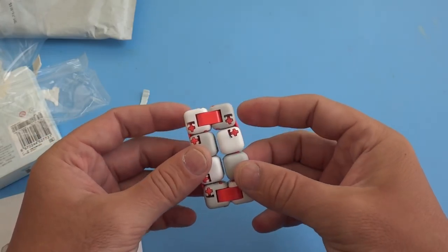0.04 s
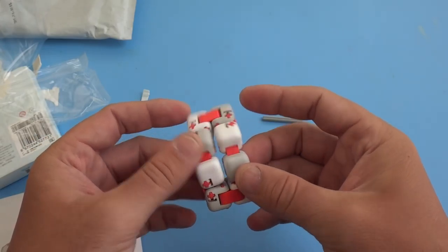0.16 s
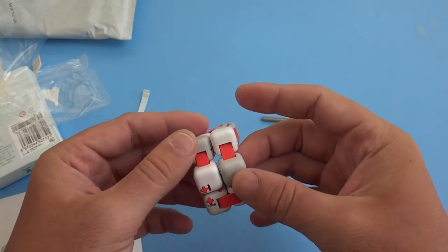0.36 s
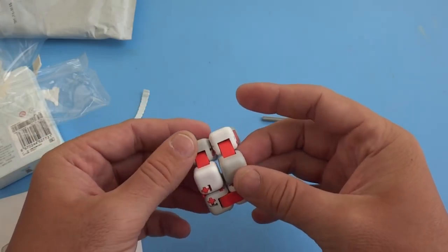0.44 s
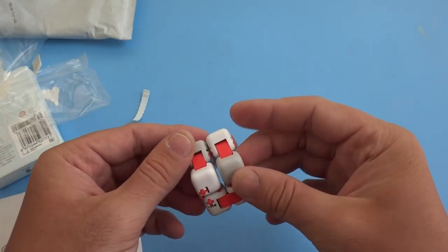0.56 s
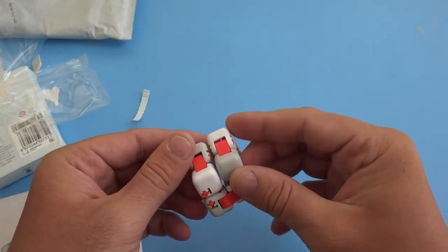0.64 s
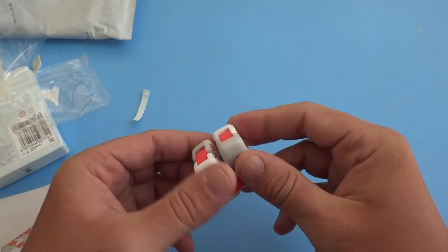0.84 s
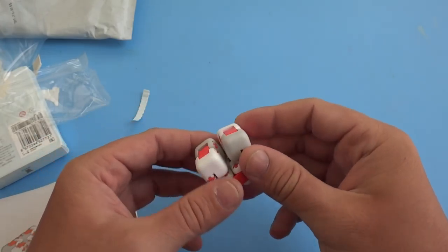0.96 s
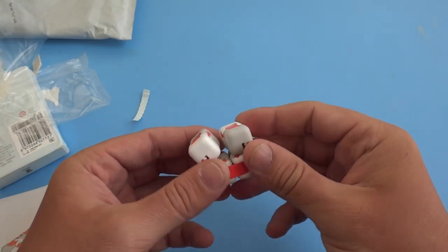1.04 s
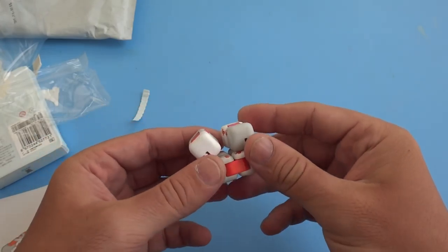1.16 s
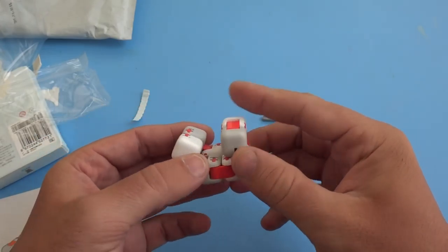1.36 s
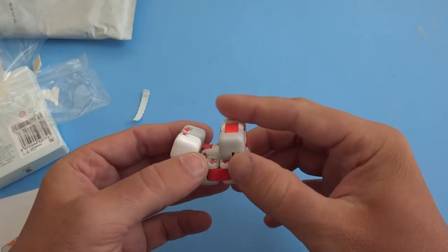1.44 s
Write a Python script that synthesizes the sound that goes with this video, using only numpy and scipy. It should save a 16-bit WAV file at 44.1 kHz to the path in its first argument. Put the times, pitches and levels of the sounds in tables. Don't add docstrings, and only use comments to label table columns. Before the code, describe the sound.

Hands fold small hollow plastic cubes near a camera microphone in a quiet room; loudest clicks and rattle come first, more snaps follow, fading to tiny taps over low rumble, hiss and fine mechanical ticking.

```python
import sys
import numpy as np
from scipy import signal
from scipy.fft import rfft, irfft
from scipy.io import wavfile

SR = 44100
rng = np.random.default_rng(int(sys.argv[2]) if len(sys.argv) > 2 else 0)


def ratio_of_db(decibels):
    return 10 ** (np.asarray(decibels, float) / 20)


def master(y):
    cut = np.clip(np.atleast_2d(y).T, -1, 1)
    pcm = np.round(cut * 32767)
    wavfile.write(sys.argv[1], SR, pcm.astype(np.int16))


N = 66150

# (time [s], peak level [dB],
# ring [Hz], bright crack level [dB], dull knock level [dB])
FOLD_TOUCHES = [(.1945, -37, 8400, -13, -15), (.2038, -35, 6460, -15, -20), (.2150, -27, 6350, -19, -24),
                (.2170, -20.5, 6700, -11, -25), (.2187, -12.5, 6420, -25, -42),
                (.2206, -23.5, 6600, -27, -38), (.2349, -24, 5800, -33, -42), (.2355, -12.5, 7300, -24, -41),
                (.2368, -10.5, 6930, -26, -40), (.2497, -33.5, 6900, -9, -26), (.2643, -32, 6200, -20, -9),
                (.4134, -25, 7400, -6, -25), (.4148, -24.5, 6600, -23, -40), (.4157, -35, 6600, -19, -23),
                (0.586, -36, 6700, -15, -23), (.5978, -33, 6700, -18, -25), (0.633, -33, 6500, -12, -13),
               (0.638, -28, 6600, -10, -13), (0.6406, -24.5, 7700, -10, -22.5),
               (.6420, -29.5, 5800, -13, -18), (0.6427, -31, 6600, -1, -15.5),
               (0.669, -21.5, 6700, -25, -29), (0.6691, -28, 6700, -26, -34), (0.688, -49, 6700, -18, -22),
               (.7640, -36, 6530, -22, -28), (.7780, -17, 7440, -14, -18.5),
               (0.7792, -11.5, 6290, -10, -19.5), (0.7805, -19, 8100, -18, -30),
               (0.7814, -28, 6800, -20, -38), (.8550, -36, 6650, -10, -15),
                (0.9462, -34.5, 6000, -17, -15), (0.948, -29.5, 6130, -6.5, -14),
             (.9510, -30, 6460, -9.5, -11), (0.966, -40, 7340, -18, -23), (1.0197, -22.5, 7280, -10.5, -27),
             (1.0199, -23, 6500, -25, -33), (1.0209, -20.5, 8150, -16, -27), (1.0203, -27, 7900, -19, -20),
             (1.0710, -32, 6350, -10.5, -12), (1.0940, -38.5, 5700, -16, -8), (1.1235, -30, 7020, -20, -19),
             (1.136, -35, 5900, -18, -25), (1.146, -43, 6000, -18, -3), (1.1768, -38.5, 6560, -22, -4),
             (1.2463, -32, 6440, -21, -16), (1.4870, -38, 6700, -20, -26)]
# (frequency [Hz], level [dB])
SIDE_RINGS = [(5450, -13), (8300, -10)]
# (frequency [Hz], width [Hz], level [dB])
CRACK_BODY = [(10020, 1320, 4), (12600, 1460, -0.5), (14570, 990, 0), (15100, 640, -13)]
# (frequency [Hz], width [Hz], level [dB])
KNOCK_BODY = [(2030, 930, -8.5), (2790, 920, -10.5), (3430, 520, 0.5), (5440, 500, -2)]
# (time [s], peak level
# [dB], ring [Hz])
TAIL_TICKS = [(0.2228, -20, 6500), (0.2232, -42, 6760), (0.2267, -26, 6200), (0.229, -32, 6330),
              (0.2323, -25, 6000), (0.2336, -23, 7020), (0.24, -35, 6890), (0.242, -31, 7900),
              (0.2432, -31, 7970), (0.245, -25, 6590), (0.2471, -21, 6550), (0.249, -26, 6660),
              (0.2498, -17, 6830), (0.252, -30, 7000), (0.2542, -30, 6160), (0.255, -26, 6560),
              (0.2582, -27, 6700), (0.2591, -34, 6930), (0.2609, -36, 7020), (0.2627, -30, 6650),
              (0.2648, -25, 6500), (0.2643, -32, 6200), (0.269, -31, 8400), (0.269, -43, 6400),
              (0.2714, -38, 6550), (0.2745, -30, 6800), (0.276, -37, 7110), (0.2794, -33, 6850),
              (0.2801, -34, 7190), (0.2826, -37, 7920), (0.2869, -48, 6240), (0.2908, -35, 6630),
              (0.4164, -53, 6800), (0.4207, -34, 6720), (0.4269, -37, 6330), (0.428, -33, 6160),
              (0.43, -40, 6800), (0.6443, -35, 8300), (0.648, -38, 6890), (0.6486, -40, 6890),
              (0.6579, -38, 6890), (0.6668, -37, 6590), (0.7856, -38, 7620), (0.7874, -40, 6540),
              (0.79, -32, 7020), (0.7922, -28, 7100), (0.7943, -31, 6590), (0.7977, -39, 7060),
              (0.805, -31, 6100), (0.806, -37, 6460), (0.8066, -33, 6550), (0.8097, -36, 6460),
              (1.0237, -37, 8350), (1.026, -32, 6500), (1.029, -31, 6040), (1.0325, -38, 6290),
              (1.0348, -31, 6680), (1.0357, -43, 8400), (1.0374, -41, 5940), (1.0395, -45, 7100)]
# (time [s], peak level [dB], ring [Hz])
WALL_RINGS = [(0.239, -55, 5260), (.2490, -43, 5400), (0.256, -38, 5000), (.2645, -51, 5240),
              (.2800, -46, 5400), (.4140, -35, 5040), (0.414, -33.5, 6220), (0.5978, -50, 4800),
              (0.6404, -37, 5370), (.6432, -44, 5500), (.6430, -49, 3600), (0.669, -34.5, 5160),
              (0.6699, -50, 2930), (.7790, -23, 5374), (.7800, -29, 5200), (0.7875, -42, 5160),
              (0.9487, -52.5, 1100), (0.949, -51, 4060), (1.02, -46.5, 3950), (1.0212, -33, 5770),
              (1.025, -40, 5360), (1.0296, -36, 5480), (1.0295, -35, 8400)]
# (time [s], level [dB])
RUB_LEVEL = [(0, -62), (.18, -57), (.213, -42.5), (.262, -39), (.30, -49), (.33, -55), (.55, -59),
             (.64, -53.5), (.70, -54), (.76, -48), (.87, -59), (.93, -56.5), (.96, -52.5), (1.06, -54),
             (1.15, -54.5), (1.22, -61), (1.27, -53), (1.33, -66), (1.5, -65)]
# (frequency [Hz], width [Hz], level [dB])
RUB_BODY = [(4480, 1200, -14), (5700, 770, -6.5), (6600, 810, -4.5), (8200, 780, -4.5),
            (10270, 2500, -14.5), (13900, 2600, -14.5)]
# (frequency [Hz], width [Hz], level [dB])
LENS_BODY = [(6700, 630, 4.5), (4500, 250, -3), (8400, 1100, -28)]
# (delay [s], level [dB])
ECHOES = [(.0062, -30), (.0140, -25), (0.029, -39)]
# (frequency [Hz], width [Hz], level [dB])
DRONES = [(143, 29, -70.5), (206.8, 35.5, -69)]
# (frequency [Hz], density [dB per Hz])
RUMBLE = [(12, -38), (20, -2), (37, -5.5), (54, -12.5), (100, -10.5), (123, -10.5), (205, -7), (236, -12.5),
          (900, -24), (1170, -24), (1980, -120)]
# (frequency [Hz], density [dB per Hz])
HISS = [(600, -14), (4470, -11.5), (5120, -15.5), (6730, -2), (7610, -7), (13500, -9.5), (15200, -18),
        (15900, -14)]
# (frequency [Hz], density [dB per Hz])
WIDE_AIR = [(12, -59), (20, -17), (289, -7), (616, -10), (729, -9), (4790, -17.5), (6530, -12),
            (13200, -25.5), (16500, -62)]

SNAP_WIDTH_HZ, SNAP_LATE_S = 995, 0.00022
SOFT_DB, SCRAPE_T60_S, SCRAPE_DB = -21, 0.012, -4.5
CRACK_T60_S, KNOCK_T60_S = 0.011, 0.016
PORT_LOW_HZ, PORT_TOP_HZ = 4990, 8920
TICK_DB, TICK_WIDTH_HZ, WALL_WIDTH_HZ = -1.5, 1300, 690
RUB_DB, RUB_PER_S, RUB_SPREAD_DB = -3.5, 1900, 3
LENS_START_S, LENS_PERIOD_S, LENS_JITTER_S = .0062, .020007, 0.00028
LENS_DB, LENS_WEAK_DB, LENS_SPREAD_DB = -49.5, -2.5, 3.5
ROOM_DB, ROOM_T60_S, ROOM_SIDE_DB = -12, 0.26, -8.5
ROOM_TOP_DB, ROOM_TOP_T60_S = -0.5, 0.14
RUMBLE_DB, HISS_DB, WIDE_DB = -61, -57, -60
SIDE_DB, SIDE_TOP_HZ = -18, 11300
SIDE_PEAK_HZ, SIDE_PEAK_DB = 9400, 9
EDGE_HZ = 16500


def evened(x):
    return x / np.sqrt(np.mean(x ** 2) + 1e-20)


def peaked(x):
    return x / (abs(x).max() + 1e-12)


def impulse(length):
    return 1. * (np.arange(length) == 0)


def add(mix, s, sound):
    part = mix[round(s * SR):][:len(sound)]
    part += sound[:len(part)]


def resonate(x, hz, width_hz):
    pole = np.exp((2j * hz - width_hz) * np.pi / SR)
    once = signal.lfilter([1 - abs(pole)], [1, -pole], x)
    return 2 * signal.lfilter([1 - abs(pole)], [1, -pole], once).real


def body(x, rings):
    out = 0
    for k, (hz, width_hz, db) in enumerate(rings):
        out = out + (-1) ** k * ratio_of_db(db) * resonate(x, hz, width_hz)
    return out


def ported(x):
    band = signal.butter(3, [PORT_LOW_HZ, PORT_TOP_HZ], btype="band", fs=SR, output="sos")
    return signal.sosfilt(band, x)


def contact(peak_db, ring_hz, crack_db, knock_db, noise):
    t = np.arange(len(noise)) / SR
    scrape = np.clip((SOFT_DB - peak_db) / 8, 0, 1)
    grit = 0.12 * np.roll(noise, 300) * ratio_of_db(-60 * t / SCRAPE_T60_S)
    tap = (1 - scrape) * impulse(len(noise)) + scrape * grit
    rings = [(ring_hz, 0)] + SIDE_RINGS
    whistle = peaked(ported(sum(ratio_of_db(db) * resonate(tap, hz, SNAP_WIDTH_HZ) for hz, db in rings)))
    soft = np.minimum(t / 0.00031, 1)
    crack = peaked(body(soft * noise * ratio_of_db(-60 * t / CRACK_T60_S), CRACK_BODY))
    knock = peaked(body(soft * noise[::-1] * ratio_of_db(-60 * t / KNOCK_T60_S), KNOCK_BODY))
    touch = whistle + ratio_of_db(crack_db + 3.5) * crack + ratio_of_db(knock_db - 3.0) * knock
    return ratio_of_db(peak_db + SCRAPE_DB * scrape) * touch


def blocks():
    touches = FOLD_TOUCHES
    out = np.zeros(N)
    for (s, *touch), noise in zip(touches, rng.standard_normal((len(touches), 900))):
        add(out, s + SNAP_LATE_S, contact(*touch, noise))
    return out


def ticking():
    out, tap = np.zeros(N), impulse(300)
    for s, db, ring_hz in TAIL_TICKS:
        tick = resonate(tap, ring_hz, TICK_WIDTH_HZ)
        for hz, side_db in SIDE_RINGS:
            tick = tick + ratio_of_db(side_db - 14.0) * resonate(tap, hz, TICK_WIDTH_HZ)
        add(out, s, ratio_of_db(db + TICK_DB) * peaked(ported(tick)))
    for s, db, hz in WALL_RINGS:
        wall = resonate(resonate(tap, hz, 1.64 * WALL_WIDTH_HZ), hz, WALL_WIDTH_HZ)
        add(out, s, ratio_of_db(db) * peaked(wall))
    return out


def rubbing():
    draw, size, sign = rng.random((3, N))
    slip_size = ratio_of_db(-RUB_SPREAD_DB * np.log(size + 0.0026))
    slips = (draw < RUB_PER_S / SR) * slip_size * np.sign(sign - .5)
    s, db = np.transpose(RUB_LEVEL)
    level_db = RUB_DB + np.interp(np.arange(N) / SR, s, db)
    return ratio_of_db(level_db) * evened(body(slips, RUB_BODY))


def room(x):
    t = np.arange(SR // 2) / SR
    noise = rng.standard_normal((2, len(t)))
    low = signal.sosfilt(signal.butter(2, 9000, fs=SR, output="sos"), noise)
    low_tail = low * ratio_of_db(-60 * t / ROOM_T60_S)
    top_tail = (noise - low) * ratio_of_db(ROOM_TOP_DB - 60 * t / ROOM_TOP_T60_S)
    tail = (low_tail + top_tail) * np.clip(t / 0.0039 - .5, 0, 1)
    tail = ratio_of_db(ROOM_DB) * tail / np.linalg.norm(tail[0])
    for s, db in ECHOES:
        add(tail[0], s, ratio_of_db(db) * evened(noise[1, :40]) / np.sqrt(40))
    mid, side = signal.fftconvolve(x[None], tail, axes=1)[:, :N]
    side = ratio_of_db(ROOM_SIDE_DB) * side
    return np.array([mid + side, mid - side])


def lens():
    k, ticks = np.arange(74), np.zeros(N)
    size, jitter = rng.standard_normal((74, 2)).T
    at = np.round((LENS_START_S + LENS_PERIOD_S * k + LENS_JITTER_S * jitter) * SR).astype(int)
    ticks[at] = ratio_of_db(LENS_DB + LENS_WEAK_DB * (k % 2) + LENS_SPREAD_DB * size)
    tick = 0
    for hz, width_hz, db in LENS_BODY:
        tick = tick + ratio_of_db(db) * resonate(resonate(impulse(600), hz, width_hz), hz, width_hz)
    return signal.oaconvolve(ticks, peaked(tick))[:N]


def hum():
    out = np.zeros(N)
    for hz, width_hz, db in DRONES:
        out += ratio_of_db(db) * evened(resonate(rng.standard_normal(N), hz, width_hz))
    return out


def air(points, level_db):
    hz = np.fft.rfftfreq(N, 1 / SR)
    f, db = np.transpose(points)
    inside = (hz >= f[0]) * (hz <= f[-1])
    shape = ratio_of_db(np.interp(np.log(hz + 1), np.log(f + 1), db)) * inside
    return ratio_of_db(level_db) * evened(irfft(rfft(rng.standard_normal(N)) * shape, N))


def scene():
    toy = blocks()
    near = toy + ticking() + rubbing()
    hz = np.fft.rfftfreq(N, 1 / SR)
    lean_db = SIDE_DB + SIDE_PEAK_DB * np.exp(-((hz - SIDE_PEAK_HZ) / 1300) ** 2)
    lean_gain = ratio_of_db(lean_db) / np.sqrt(1 + (hz / SIDE_TOP_HZ) ** 12)
    lean = irfft(rfft(near) * lean_gain, N)
    wide = air(WIDE_AIR, WIDE_DB) - lean
    centre = near + lens() + hum() + air(RUMBLE, RUMBLE_DB) + air(HISS, HISS_DB)
    return centre + room(toy) + np.array([wide, -wide])


def band_limit(x):
    return signal.sosfilt(signal.butter(12, 16670, fs=SR, output="sos"), x)


def record(dry):
    low_pass = signal.firwin(255, EDGE_HZ, window=("kaiser", 8), fs=SR)
    mix = signal.oaconvolve(dry, low_pass[None], "same")
    return band_limit(mix)


dry = scene()
out = record(dry)
master(out)
```